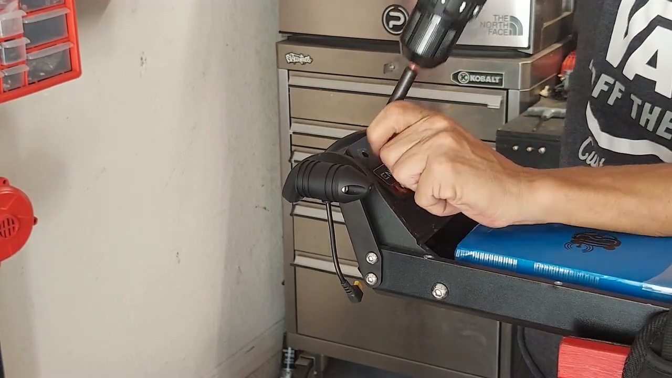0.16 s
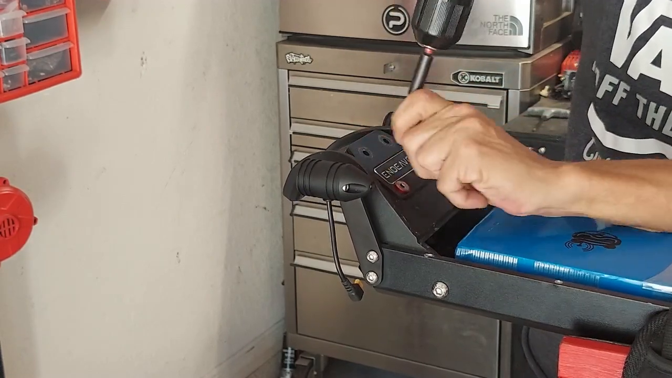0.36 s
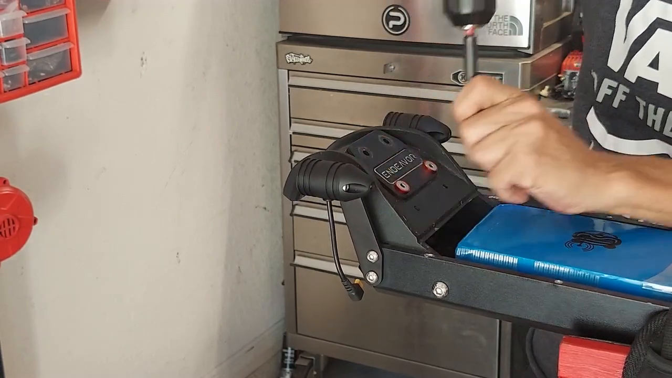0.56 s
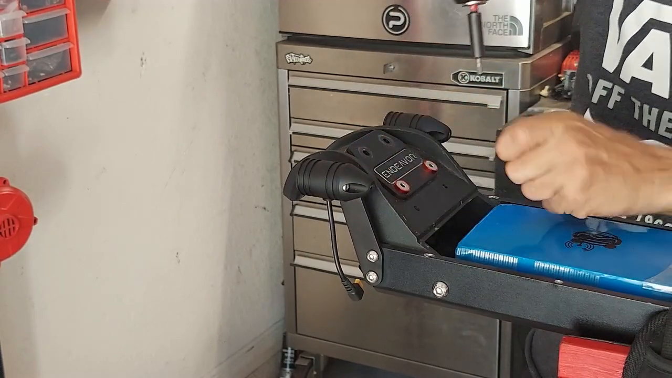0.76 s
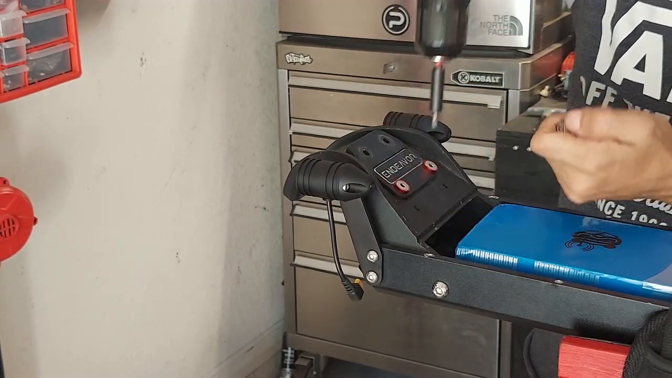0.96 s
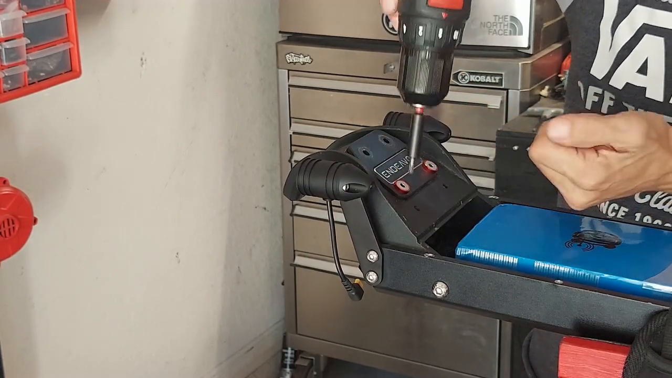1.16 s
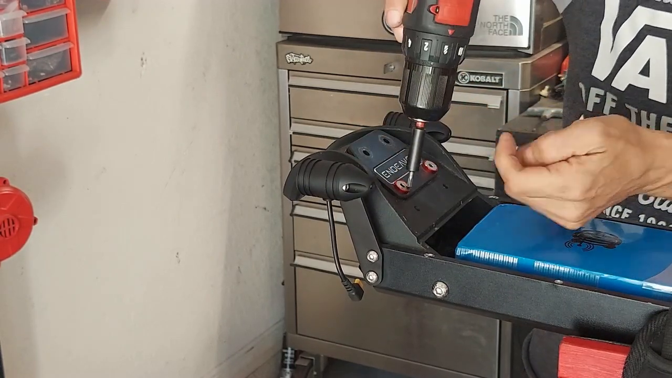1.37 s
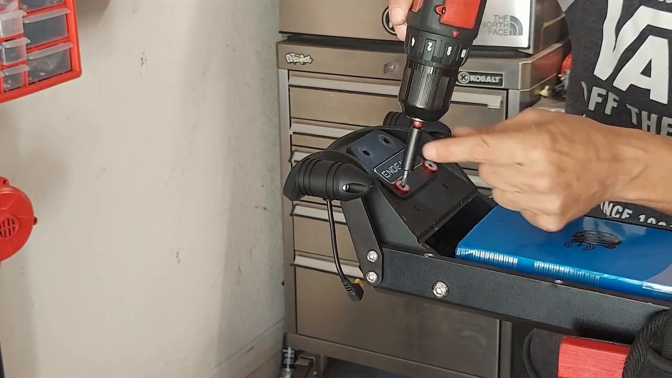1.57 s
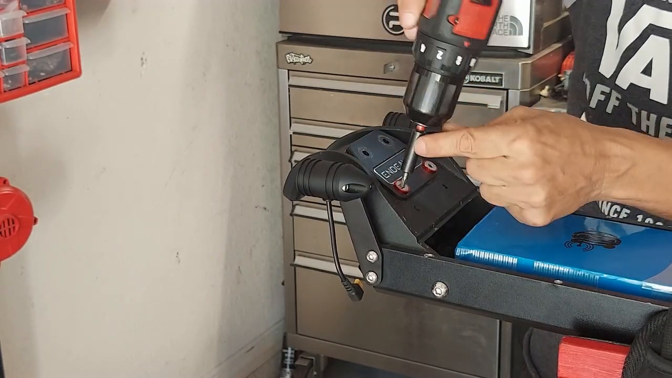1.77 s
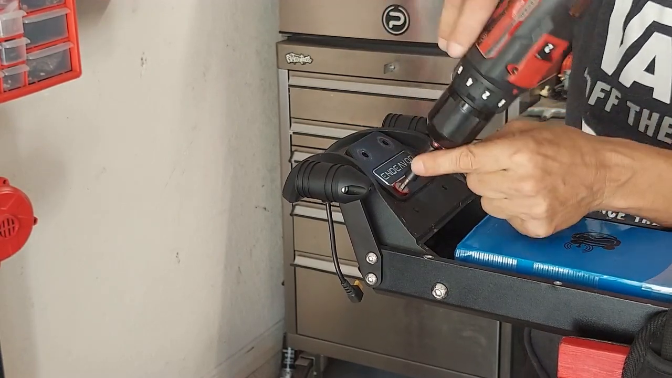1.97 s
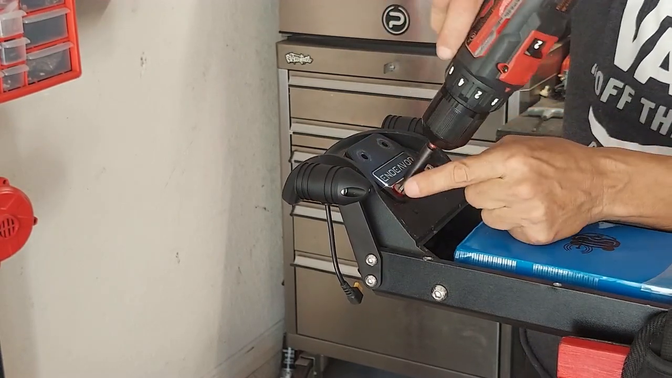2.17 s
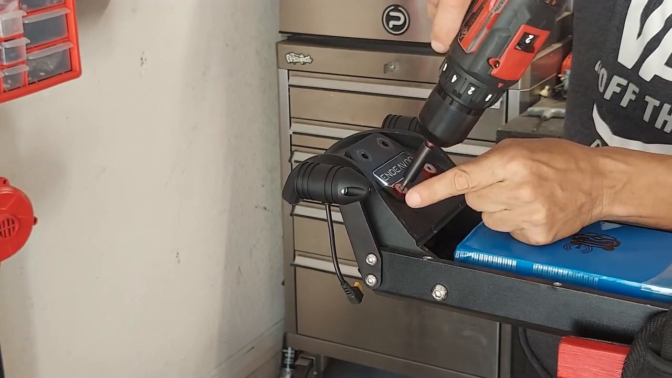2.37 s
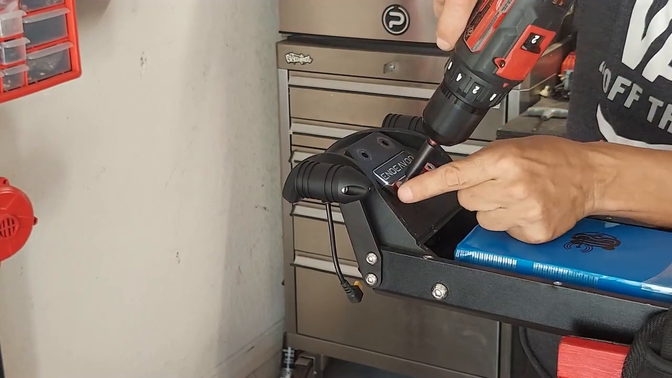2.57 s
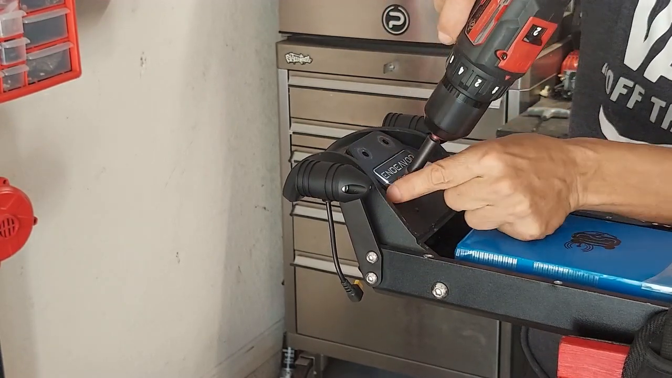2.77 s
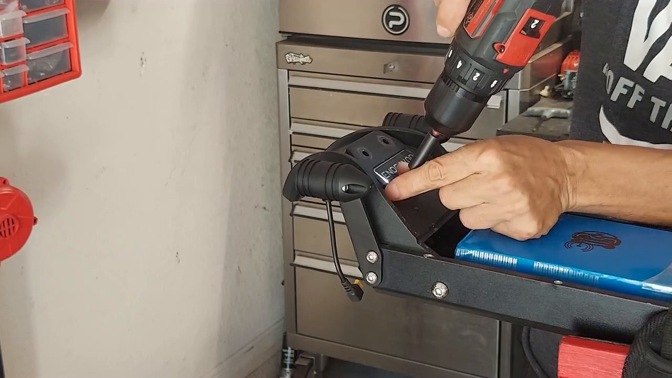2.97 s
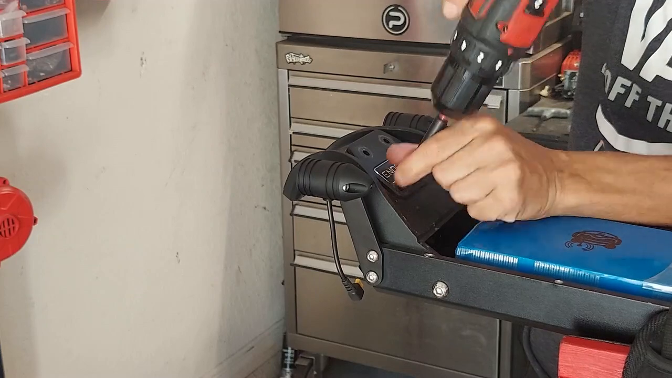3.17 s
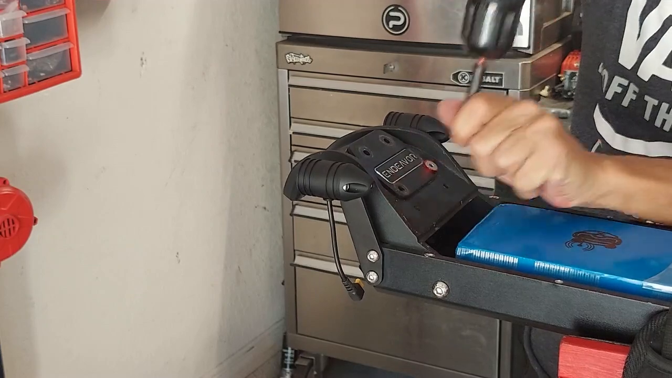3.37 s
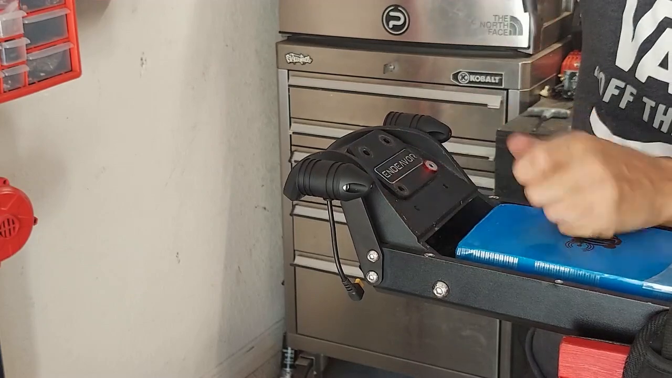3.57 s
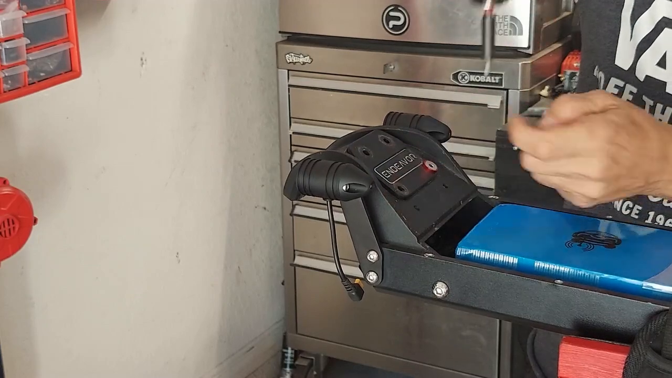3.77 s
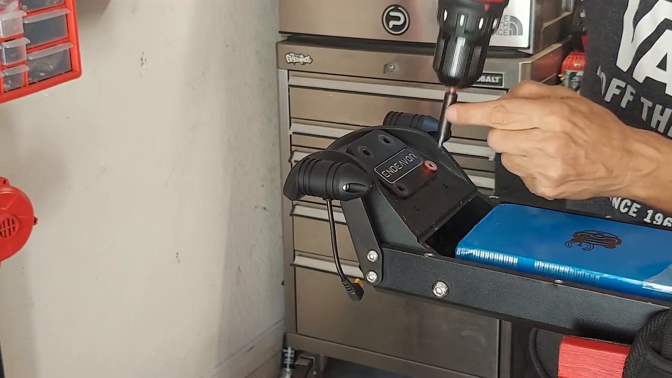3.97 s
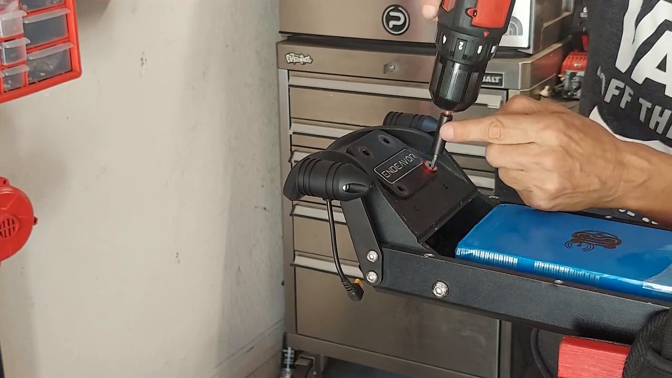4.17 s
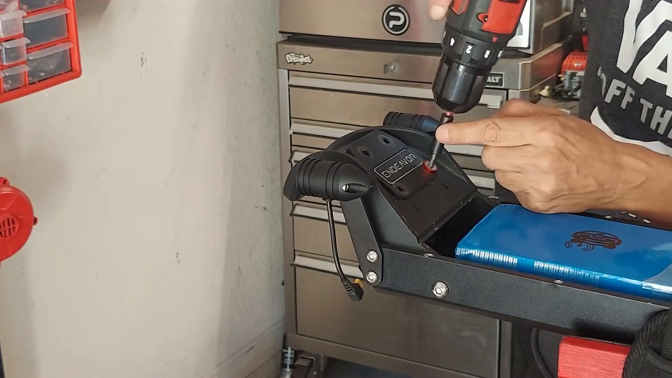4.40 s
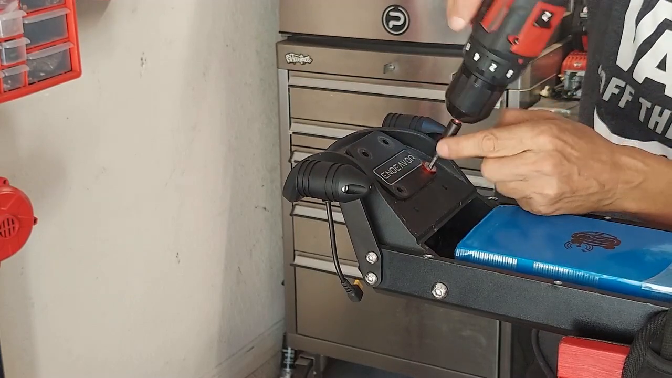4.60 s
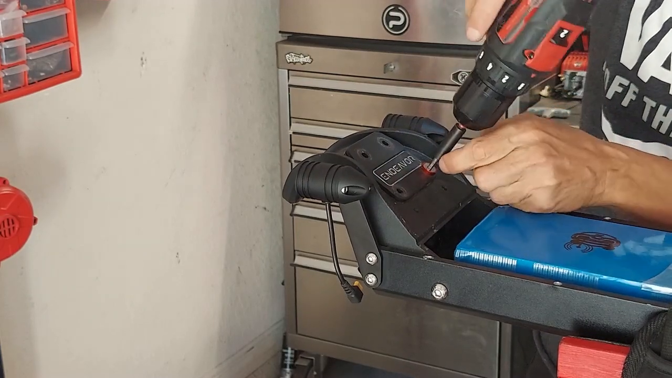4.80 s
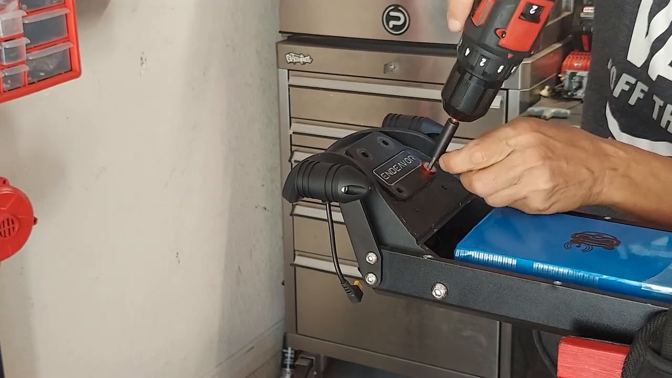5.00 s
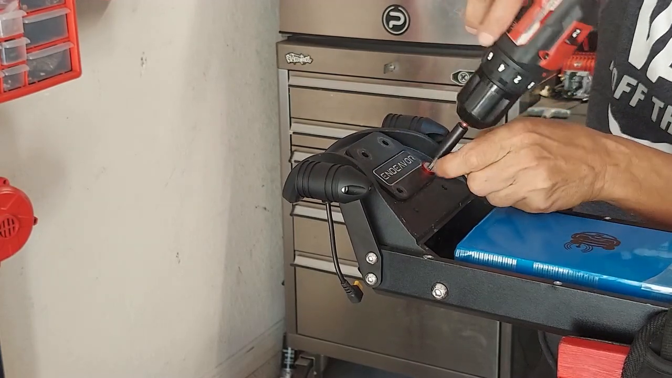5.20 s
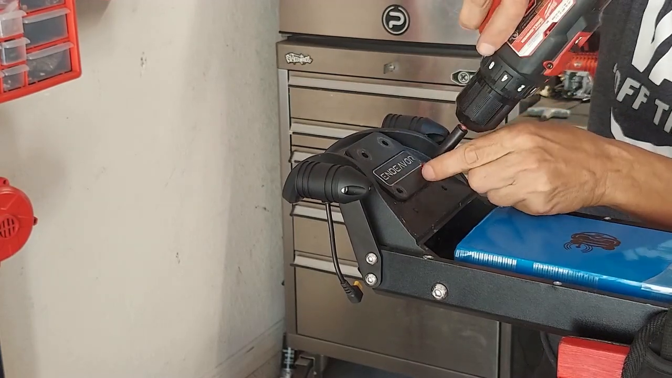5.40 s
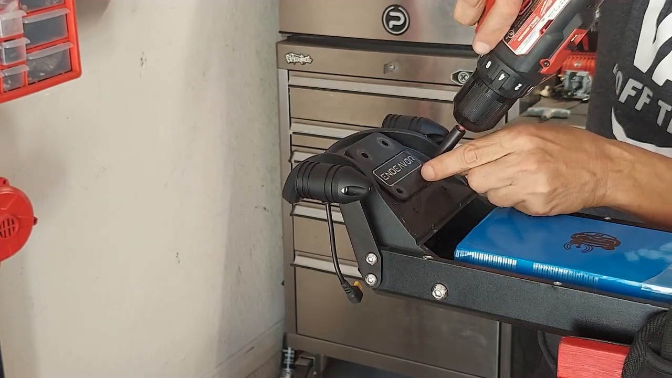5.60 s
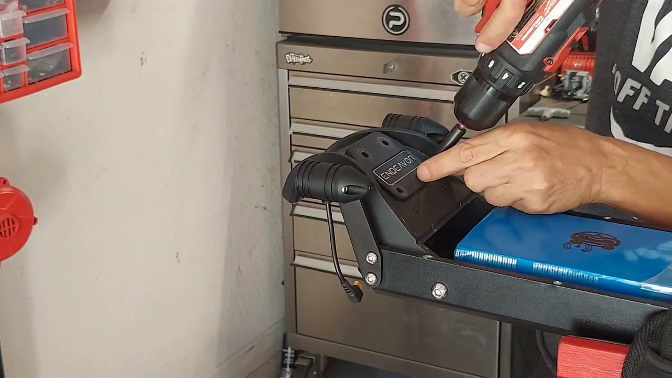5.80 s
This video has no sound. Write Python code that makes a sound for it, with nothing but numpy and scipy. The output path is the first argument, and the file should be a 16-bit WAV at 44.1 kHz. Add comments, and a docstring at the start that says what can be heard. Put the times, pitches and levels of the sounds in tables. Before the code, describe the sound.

In a bare garage, a cordless drill whirs for under a second between light clicking of screw and bit, ending with a plastic knock.

```python
"""Drill backing out a screw

A cordless drill backs a small screw out of a plastic housing in a garage, an arm's length from a phone with one mic.
The motor is sines at multiples of its shaft rate over shaped noise for the gear rattle; it spins up and brakes.
Bit, screw and fingers tick, clink and rub: short scrapes, ringing sines and swells of grainy noise.
A harder knock lands near the end. Bare walls ring for half a second, over low outdoor rumble."""
import sys
import numpy as np
from scipy import signal
from scipy.fft import rfft, irfft
from scipy.io import wavfile
from scipy.ndimage import uniform_filter1d

SR = 44100
rng = np.random.default_rng(int(sys.argv[2]) if len(sys.argv) > 2 else 0)


def makeup_ratio(level_db):
    """Linear amplitude ratio for a level in decibels (20 dB per factor of ten)."""
    decades = np.asarray(level_db, float) / 20
    return 10 ** decades


def materialize(psi):
    """Save the field psi as 16-bit PCM at rate SR to the path in sys.argv[1].

    A 1-D psi becomes a single channel; in a 2-D psi each row is a channel.
    """
    bounded = np.clip(np.atleast_2d(psi).T, -1, 1)
    quanta = np.round(bounded * 32767).astype(np.int16)
    wavfile.write(sys.argv[1], SR, quanta)


N = 257835
T = np.arange(N) / SR


def level(x, db):
    """Scale a sound to an rms level in dB."""
    return x * makeup_ratio(db) / np.sqrt(np.mean(x ** 2))


def colour(x, points):
    """Shape the spectrum of a noise by (Hz, dB) points."""
    hz, db = np.transpose(points)
    f = np.fft.rfftfreq(len(x), 1 / SR)
    gain_db = np.interp(np.log(f + 1), np.log(hz), db, -90, -90)
    return irfft(rfft(x) * makeup_ratio(gain_db), len(x))


def band(x, hz, width):
    """Two-pole resonance, width in Hz, with gain 1 at the centre."""
    return signal.lfilter(*signal.iirpeak(min(hz, SR / 2.3), hz / width, SR), x)


def walk(rate):
    """Random wander: each level is held for 1 / rate seconds, then the steps are smoothed twice."""
    k = int(SR / rate)
    steps = np.repeat(rng.standard_normal(N // k + 1), k)
    return uniform_filter1d(uniform_filter1d(steps, k), k)[:N]


def ring(modes, t):
    """Dying sines set off together, neighbours pushing in opposite directions."""
    return sum((-1) ** k * makeup_ratio(db - 60 * t / t60) * np.sin(2 * np.pi * hz * t)
               for k, (hz, db, t60) in enumerate(modes))


def add(out, s, sound, db):
    """Lay a sound into the output at time s with its peak at db."""
    i = int(s * SR)
    out[i:i + len(sound)] += (sound * makeup_ratio(db) / np.abs(sound).max())[:N - i]


# colour of the air noise, before its overall level is set: f/Hz, level/dB (per Hz)
AIR_COLOUR = [(15, -56.5), (25, -46.5), (45, -5.5), (70, -4), (123, -0.5), (141, -14), (166, -2.5),
              (223, -6.5), (384, -9.5), (516, -13), (863, -15), (1890, -22), (2050, -24), (11900, -37),
              (16000, -47)]
# low outdoor rumble, before a 3 dB lift and its wavering: t/s, level/dB
RUMBLE_LEVEL = [(0, -50), (.15, -56.5), (.7, -50.5), (1.45, -64.5), (2.7, -58.5), (3.25, -59), (3.45, -62),
                (4.6, -76), (5.85, -55)]
# faint steady tones from far off, before their wavering: start t/s, end t/s, f/Hz, level/dB
FAR_TONES = [(0, 5.85, 116, -64), (3.3, 4.35, 175, -61), (4.9, 5.45, 388, -70), (0, 5.85, 12050, -83)]


def background():
    """Smooth air noise, microphone hiss, a low hum that wavers in pitch and level, and faint far tones."""
    air = level(colour(rng.standard_normal(N), AIR_COLOUR), -55) * makeup_ratio(0.8 * walk(3))
    hiss = makeup_ratio(-71.5) * rng.standard_normal(N)
    hum_hz = 76 + 3.0 * walk(9)
    hum = np.sin(2 * np.pi * np.cumsum(hum_hz) / SR) * makeup_ratio(3 + 2.5 * walk(12))
    hum *= makeup_ratio(np.interp(T, *np.transpose(RUMBLE_LEVEL)))
    tones = np.zeros(N)
    for start, end, hz, db in FAR_TONES:
        fade = np.clip(np.minimum(T - start, end - T) / .08, 0, 1)
        tones += makeup_ratio(db + 2.5 * walk(12)) * np.sin(2 * np.pi * hz * T) * fade
    return air + hiss + hum + tones


# ticks of bit, screw and fingers: t/s, level/dB (peak), f/Hz (centre), dull part level/dB, sizzle level/dB
# part levels compare with the middle part, before 2 dB more for dull and 10 dB more for sizzle
TICKS = [(.080, -32, 2260, 26, -22), (.108, -24.5, 6200, -8.5, -18), (0.294, -35.5, 2930, -6, -14),
         (0.353, -40, 3900, -1, -21), (.517, -42.5, 3040, 5, -22), (.647, -30.5, 1820, -5, -13.5),
         (.671, -33, 2540, 0, -8), (.708, -37, 2050, 2, -6), (1.116, -40.5, 2850, -15, -17),
         (1.152, -27.5, 5940, -35, -27), (1.382, -32, 6000, -30, -19), (1.388, -32.5, 4500, -29, -19),
         (1.399, -34.5, 6400, -29, -22), (1.425, -20.5, 3680, -12, -27), (1.551, -43, 7500, -30, -22),
         (1.614, -26, 4350, -10, -25), (1.677, -32.5, 3200, -13, -19), (1.701, -40, 5280, 0, -29),
         (1.843, -33.5, 3000, -4.5, -30), (1.99, -40.5, 2170, 2, -21), (2.027, -38, 2280, 15, -27),
         (2.297, -35.5, 4250, -2, -17), (2.336, -30.5, 1960, 11, -32), (2.356, -23, 3600, 9, -30),
         (3.249, -20.5, 4000, -4.5, -29), (3.252, -21.5, 5030, -10, -22), (3.546, -35.5, 4200, -1.5, -9),
         (3.681, -31.5, 3470, -10, -18), (3.705, -37.5, 5600, -1, -29), (3.719, -33, 6950, -28, -29),
         (3.781, -35, 5500, -26, -20), (3.789, -29, 4630, -25, -21), (3.798, -32.5, 7700, -31, -27),
         (3.811, -30, 6000, -16, -18), (3.82, -32, 7560, -33, -21), (3.832, -22.5, 6000, -22, -17),
         (3.849, -25, 6760, -40, -17), (3.943, -31, 8250, -37, -20), (3.953, -33.5, 4000, -35, -17),
         (4.24, -43, 2820, -6, -27), (4.275, -36, 2200, 5, -33), (4.283, -34.5, 4550, -11, -26),
         (4.432, -42, 3300, -14, -22), (4.447, -37, 4730, -2, -22), (4.462, -39, 3630, 12, -30),
         (4.628, -38, 5030, -23, -27), (4.678, -40, 6400, -19, -28), (4.695, -30.5, 6300, -35, -28),
         (4.712, -23.5, 6160, -42, -26), (4.717, -26.5, 7000, -38, -31), (4.723, -27, 4700, -23, -15),
         (5.006, -28.5, 5740, -16, -22), (5.066, -28, 3300, -5.5, -25), (5.155, -36, 5740, -30, -15),
         (5.836, -30, 4370, -4, -17.5)]


def ticks():
    """Each contact is a short scrape with a middle, a dull and a sizzling part; dull ones come from further off."""
    usual_ms, usual_db = 2.8, -33.5  # time constant of a scrape at this peak level
    harder_longer = 0.15  # a harder tick scrapes on longer: dB of length per dB of level
    near, far, t = np.zeros(N), np.zeros(N), T[:SR // 20]
    for s, db, hz, dull_db, sizzle_db in TICKS:
        ms = usual_ms * makeup_ratio(harder_longer * (db - usual_db))
        # rough grit plus one sharp click
        push = .45 * rng.standard_normal(len(t)) + (t == T[3]) * 4
        # centre Hz, width Hz, level dB, times longer: the housing's dull body outlasts the metal
        parts = ((hz, 1.06 * hz, 0, 1), (850, 1100, dull_db + 2.0, 1.8), (12000, 6500, sizzle_db + 10.0, 1))
        sound = np.zeros(len(t))
        for f, width, part_db, longer in parts:
            scrape = push * np.exp(-1000 * t / (ms * longer))
            sound += level(band(band(scrape, f, width), f, 0.85 * width), part_db)
        add(near, s, sound, db)
        add(far, s, sound, db - 7.5 + 0.16 * np.clip(dull_db, -30, 5))
    return near, far


# how long the bare walls ring: f/Hz, t/s (to fall by 60 dB)
WALL_RING = [(200, 0.5), (1000, 0.53), (4000, 0.39), (12000, 0.095)]


def room(x):
    """Dense wall echoes: bands of noise one octave apart, each dying at its own pace."""
    t, tail = T[:SR], 0
    ring_hz, ring_s = np.transpose(WALL_RING)
    for hz in 125 * 2. ** np.arange(8):
        t60 = np.interp(np.log(hz), np.log(ring_hz), ring_s)
        tail = tail + band(rng.standard_normal(SR), hz, hz * .7) * makeup_ratio(-60 * t / t60)
    tail = tail * (1 - np.exp(-t / 0.0011))  # first echoes need a few ms to arrive
    return signal.fftconvolve(x, tail / np.sqrt(np.sum(tail ** 2)))[:N]


def strike(blows, modes, crack_hz, crack_db):
    """A sharp contact cracks and rings an object; crack_db is the crack's level against the ring."""
    out, t = np.zeros(N), T[:SR // 8]
    click = 1. * (t == 0)
    crack = band(band(click, crack_hz, 0.61 * crack_hz), crack_hz, 2.05 * crack_hz)
    sound = level(ring(modes, t), 0) + level(crack, crack_db)
    for s, db in blows:
        add(out, s, sound, db)
    return out


# the housing is struck: t/s, level/dB (peak)
KNOCKS = [(.2033, -33.5), (5.5925, -5.5)]
# how the struck plastic rings, levels against each other: f/Hz, level/dB, t/s (to fall by 60 dB)
PLASTIC_RING = [(320, 3, 0.037), (586, -1, 0.016), (1200, 12.5, 0.01), (1390, 4, 0.027),
                (1920, -19, 0.0061), (2040, -7.5, 0.0065), (3000, -23, 0.012), (3900, -4, 0.034),
                (5280, -5, 0.0098)]


def knock():
    """A blow on the housing cracks and rings its plastic walls."""
    return strike(KNOCKS, PLASTIC_RING, 1600, -0.95)


# the bit strikes the screw, chattering as it drops out: t/s, level/dB (peak)
CLINKS = [(0.2036, -11.5), (3.0292, -20), (3.03, -5), (3.0316, -10), (3.0327, 0)]
# how the steel bit rings, levels against each other: f/Hz, level/dB, t/s (to fall by 60 dB)
STEEL_RING = [(4280, 2, 0.013), (5240, -5.5, 0.011), (6620, -14.5, 0.016), (8870, -9, 0.0061),
              (10940, -9, 0.0094), (12740, -7.5, 0.0098)]


def clinks():
    """The bit hits the screw, and the steel rings high and briefly."""
    return strike(CLINKS, STEEL_RING, 5540, 0.5)


# slides: start t/s, length t/s (loudest after a third), f/Hz (centre), level/dB (rms of the grain before it swells)
SLIDES = [(0.23, 0.05, 1390, -49.5), (0.497, 0.089, 1340, -58), (0.657, 0.043, 1430, -57.5),
          (1.387, 0.016, 5500, -48), (1.415, 0.042, 550, -55), (1.612, 0.04, 546, -54),
          (1.851, 0.098, 1330, -51.5), (3.7, 0.029, 6000, -59), (4.27, 0.02, 740, -43.5),
          (4.415, 0.072, 3500, -58.5), (4.444, 0.02, 4400, -51.5), (5.02, 0.022, 6550, -55),
          (5.12, 0.039, 6300, -59.5)]


def rubs():
    """Skin and bit sliding over plastic: grainy noise that swells fast and fades."""
    out = np.zeros(N)
    for s, length, hz, db in SLIDES:
        grain = rng.standard_normal(N) * makeup_ratio(3.2 * walk(160))
        x = np.maximum(T - s, 0) / length
        swell = 3 * x * np.exp(1 - 3 * x)
        out += level(band(band(grain, hz, .7 * hz), hz, hz), db) * swell
    return out


FREE_TURNS_HZ = 281.6  # shaft turns per second with nothing holding it
# the trigger is pulled, the finger eases off, the brake bites, the shaft stops
TRIGGER_S, EASE_S, BRAKE_S, STOP_S = 2.346, 3.11, 3.179, 3.256


def shaft():
    """Turns per second, share of screw drag and share of spin-up torque."""
    # the screw holds the motor back until it comes loose: moment and spread of the letting go
    loose_s, loosen_s = 2.695, .042
    drag = 1 / (1 + np.exp(np.clip((T - loose_s) / loosen_s, -50, 50)))
    rise = np.tanh(np.maximum(T - TRIGGER_S, 0) / .091)
    held = .0068 * np.exp(-np.maximum(T - 3.03, 0) / .03)  # the last thread holds until the screw drops out
    sag = 3400 * np.clip(T - EASE_S, 0, BRAKE_S - EASE_S) ** 2  # 3400 Hz per s squared
    brake = np.exp(-np.maximum(T - BRAKE_S, 0) / .036)
    hz = (FREE_TURNS_HZ * rise * (1 - .047 * drag - held) - sag) * brake
    return hz, drag, 1 - rise ** 2


def speed_law(law, speed_db, drag):
    """Level in dB that follows the shaft speed and the drag of the screw."""
    db, per_db, drag_db = law
    return db + per_db * speed_db + drag_db * drag


def chorus(orders, turn):
    """Sines at multiples of the shaft rate; the weaker a line, the more it flickers."""
    return sum(makeup_ratio(db + (1 - db / 7) * walk(45)) * np.sin(k * turn + k * k) for k, db in zip(*orders))


# whine lines, levels within each set before flicker and the laws below; threes come from the commutator
# first row: multiples of the shaft rate; second row: level/dB
LOW_WHINE = ((1, 3, 5, 9), (-21, 0, -14, -15))
HIGH_WHINE = ((12, 13, 15, 16, 18, 19, 21, 24, 25, 27, 30, 36, 39, 45),
              (-16, -11, 0, -12, -9, -19, -22, -13, -21, -18, -19, -21, -26, -26))
# the same two rows for the lines that sing only while the screw drags
DRAG_WHINE = ((24, 27, 30, 33, 42, 45, 48, 51), (-4, -6, -6, -2, -3, -5, -10, -12))
# how each whine set follows speed: level/dB at free speed, dB per dB of speed, dB added at full drag
LOW_WHINE_LAW = (-30, .6, -5)
HIGH_WHINE_LAW = (-25.8, 9, 1)


def whine(turn, speed_db, drag, torque):
    """Motor and gear mesh sing at multiples of the shaft rate; easing off and braking change the low part."""
    surge_db, die_s, ease_db = 11, .013, -6  # the brake current kicks the low whine up, then it dies
    braked = np.maximum(T - BRAKE_S, 0) / die_s
    eased = np.clip((T - EASE_S) / (BRAKE_S - EASE_S), 0, 1)
    powered = (1 + makeup_ratio(surge_db) * braked) * np.exp(-braked ** 2) * makeup_ratio(ease_db * eased)
    low = chorus(LOW_WHINE, turn) * makeup_ratio(speed_law(LOW_WHINE_LAW, speed_db, drag))
    high = chorus(HIGH_WHINE, turn) * makeup_ratio(speed_law(HIGH_WHINE_LAW, speed_db, drag))
    strain = chorus(DRAG_WHINE, turn) * drag * makeup_ratio(-36 + 3 * speed_db)
    mesh = makeup_ratio(4.5 * walk(50)) * np.sin(10.21 * turn)
    mesh *= makeup_ratio(-39 + 19 * torque + 1.3 * speed_db)  # louder by 19 dB at full spin-up torque
    return high + strain + (low + mesh) * powered


# colour of gear and brush noise, before its overall level is set: f/Hz, level/dB (per Hz)
RATTLE_COLOUR = [(88, -40), (150, -21), (275, -13.5), (466, -17), (759, -6), (821, -17.5), (941, -8),
                 (1210, -9.5), (1720, -7.5), (2100, -9.5), (2450, -8), (4240, -5.5), (8900, -19.5),
                 (12200, -17.5), (16000, -35.5)]
# how the rattle follows speed: level/dB at free speed, dB per dB of speed, dB added at full drag
RATTLE_SPEED_LAW = (-26, .95, 2.2)


def gear_rattle(turn, speed_db, drag):
    """Noise of uneven tooth contacts, beaten by each turn; it clatters as the shaft is braked."""
    teeth = rng.standard_normal(N) * makeup_ratio(np.minimum(.8 * rng.exponential(size=N), 9))
    rattle = level(colour(teeth, RATTLE_COLOUR), 0)
    dull = signal.sosfilt(signal.butter(2, 6000, fs=SR, output="sos"), rattle)
    bright = (rattle - dull) * makeup_ratio(0.66 * speed_db)  # the top drops further at low speed
    beat = (1 + .2 * np.sin(turn)) * makeup_ratio(.7 * walk(25) + 1.2 * walk(240))
    running = (dull + bright) * beat * makeup_ratio(speed_law(RATTLE_SPEED_LAW, speed_db, drag))
    # the braked gear train runs into its slack and clatters, harder until the chuck stands
    slack = np.clip((T - BRAKE_S) / (STOP_S - BRAKE_S), 0, 1) * np.exp(-np.maximum(T - STOP_S, 0) / 0.0028)
    clatter = rattle * slack * makeup_ratio(-39.5 + 5.5 * walk(160))
    # the run that has just ended still echoes from the walls
    earlier_run = np.roll(rattle, N // 2) * makeup_ratio(-48 - 126 * T)
    return running + clatter + earlier_run


# the torque kick rings the handle, before the shell's boost: t/s, level/dB (peak)
KICKS = [(2.363, -28.5), (3.258, -38.5)]


def handle_kicks():
    """A kick of torque rings the handle as one low, dying sine."""
    out, t = np.zeros(N), T[:SR // 4]
    sound = ring([(326.6, 0, 0.22)], t) * (1 - np.exp(-t / 0.0022))
    for s, db in KICKS:
        add(out, s, sound, db)
    return out


# drill shell resonances: f/Hz, width f/Hz, level/dB (full boost)
SHELL_BOOSTS = [(781, 26, 13), (1740, 220, 7), (2550, 200, 5), (7000, 500, 4), (10100, 330, 9)]


def through_shell(x, share):
    """The plastic shell boosts some bands, by a share of its full boost in dB."""
    return x + sum((makeup_ratio(share * db) - 1) * band(x, hz, width) for hz, width, db in SHELL_BOOSTS)


def drill():
    """One turning shaft drives both whine and rattle, heard with the handle kicks through the shell."""
    hz, drag, torque = shaft()
    speed_db = 20 * np.log10(hz / FREE_TURNS_HZ + 1e-5)
    turn = 2 * np.pi * np.cumsum(hz * (1 + .0006 * walk(60))) / SR  # shaft angle, slightly unsteady
    singing = whine(turn, speed_db, drag, torque)
    rough = gear_rattle(turn, speed_db, drag) + handle_kicks()
    # the rattle and handle kicks take only half of the shell's boost
    return through_shell(singing, 1) + through_shell(rough, .5)


def scene():
    """Near sounds, their echo and the background, the same in both channels."""
    motor, (near, far), slide = drill(), ticks(), rubs()
    clink, thump = clinks(), knock()
    echo = room(makeup_ratio(-18.0) * motor + far + makeup_ratio(-11.5) * slide + makeup_ratio(-14.5) * clink + makeup_ratio(-4.5) * thump)
    low_cut = signal.butter(2, 220, "high", fs=SR, output="sos")  # small things radiate no bass
    mono = signal.sosfilt(low_cut, motor + near + slide + clink + thump + echo) + background()
    return np.array([mono, mono])


def band_limit(x):
    """A steep low-pass at the top of the band."""
    return signal.sosfilt(signal.butter(12, 16550, fs=SR, output="sos"), x)


def record(dry):
    """The phone cuts the very top, above 15.7 kHz."""
    top_cut = signal.ellip(8, .2, 60, 15700, fs=SR, output="sos")
    mix = signal.sosfilt(top_cut, dry)
    return band_limit(mix)


dry = scene()
out = record(dry)
materialize(out)
```